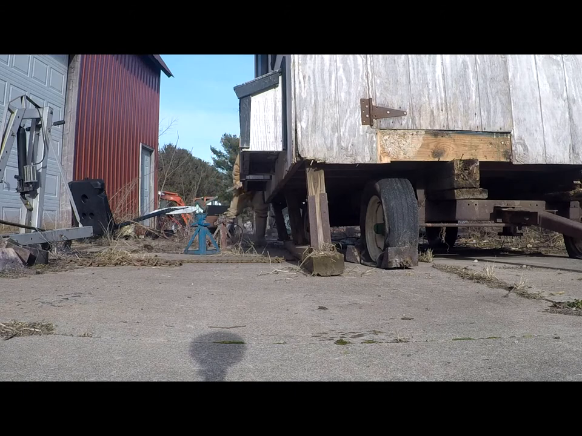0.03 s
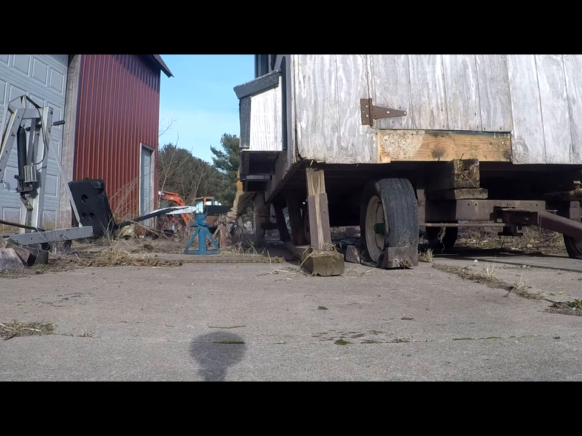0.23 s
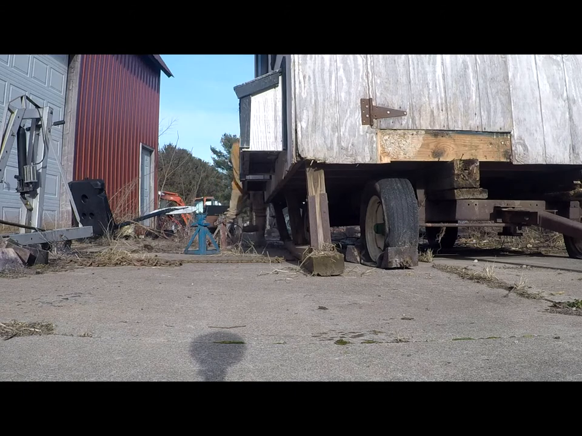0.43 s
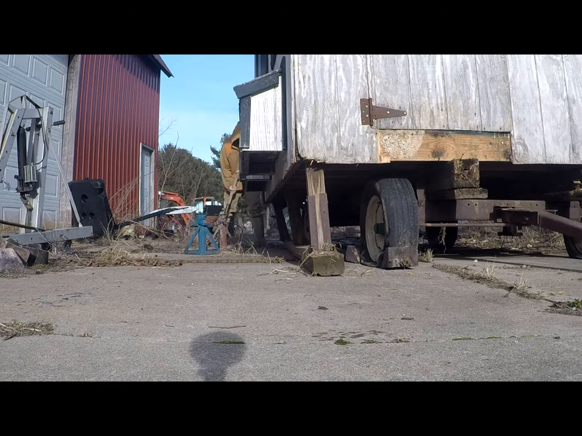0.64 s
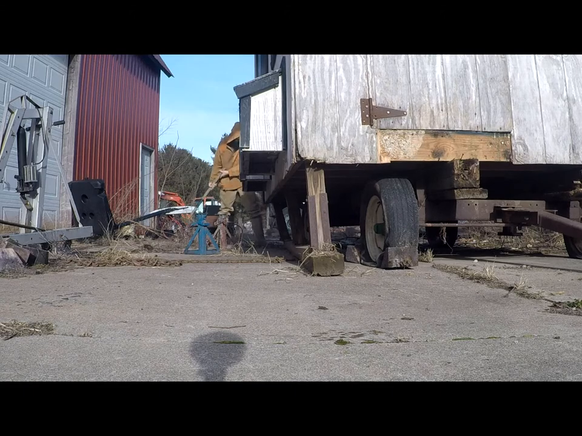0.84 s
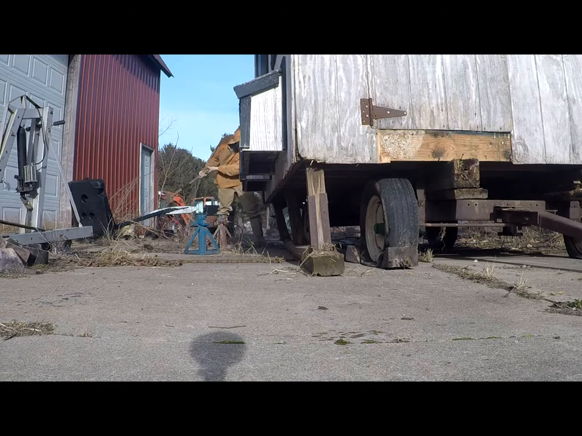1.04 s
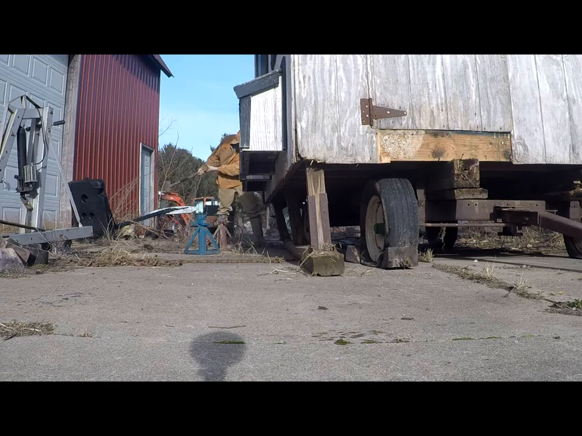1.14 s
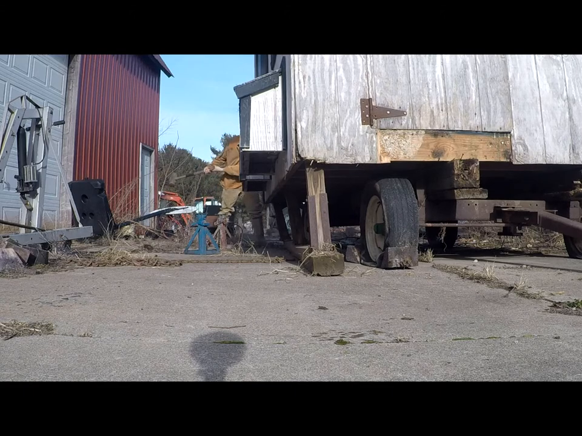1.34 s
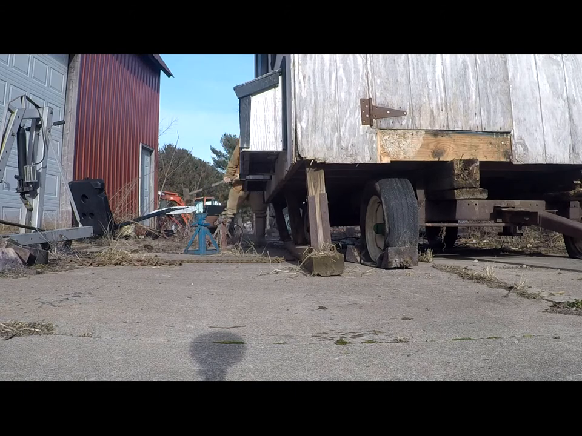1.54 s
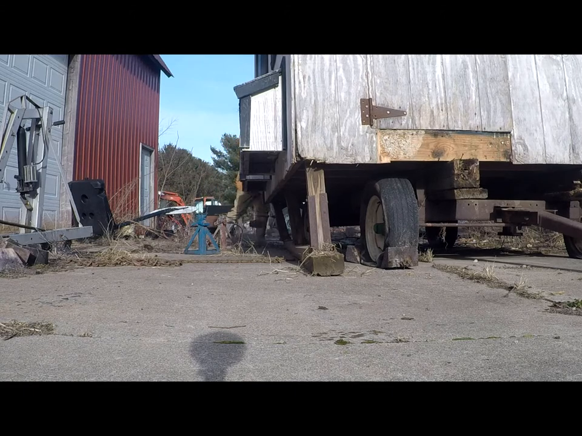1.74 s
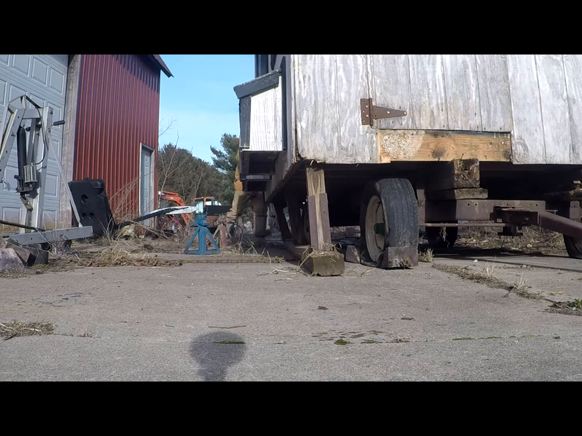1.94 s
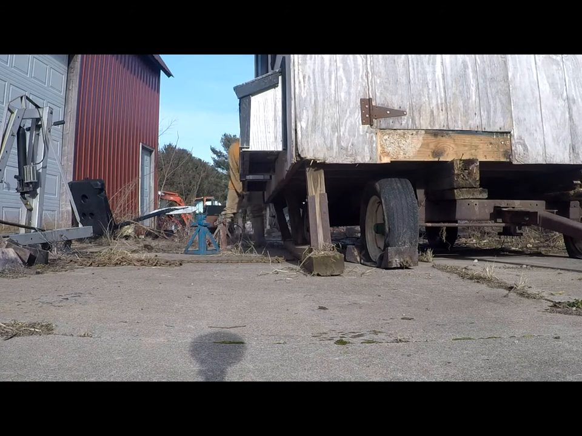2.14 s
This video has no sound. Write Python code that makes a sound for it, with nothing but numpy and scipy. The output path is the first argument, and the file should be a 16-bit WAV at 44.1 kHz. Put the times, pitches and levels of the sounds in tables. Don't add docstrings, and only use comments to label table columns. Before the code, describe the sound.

Jack handle slams twice outdoors, loud overloaded metallic clanks with woody boom and barn-wall echo

```python
import sys
import numpy as np
from scipy import signal
from scipy.io import wavfile
from scipy.ndimage import uniform_filter1d

SR = 44100
rng = np.random.default_rng(int(sys.argv[2]) if len(sys.argv) > 2 else 0)


def how_loud(loudness_db):
    steps = np.asarray(loudness_db, float) / 20
    return 10 ** steps


def unload_wav(signal):
    wavfile.write(
        sys.argv[1],
        SR,
        np.round(np.clip(np.atleast_2d(signal).T, -1, 1) * 32767).astype(np.int16),
    )


N = 97020

# contact in seconds, level in dB, timber boom in dB, brightness in dB per octave,
# time until the limiter catches it in seconds.
BLOWS = [
    (0.2511, 0.8, 1.9, 0.57, 0.03),
    (1.8436, -0.2, -6, -0.46, 0.037),
]


def at_hz(points, hz):
    return np.interp(np.log(hz), np.log(np.array(points)[:, 0]), np.array(points)[:, 1])


def rms_one(x):
    return x / np.sqrt(np.mean(x ** 2) + 1e-20)


def band(low_hz, high_hz, x):
    edges_hz = [low_hz, min(high_hz, .45 * SR)]
    return signal.sosfilt(signal.butter(2, edges_hz, "band", fs=SR, output="sos"), x)


def decay(start_s, t60, attack_s=.001):
    t = np.maximum(np.arange(N) / SR - start_s, 0)
    return np.minimum(t / attack_s, 1) * how_loud(-60 * t / t60)


def strike(modes, hits, spread_db):
    out = np.zeros(N)
    luck = rng.standard_normal((len(hits), len(modes)))
    for k, (hz, db, t60) in enumerate(modes):
        clicks = np.full(N, 1e-18)
        for (s, hit_db), z in zip(hits, luck[:, k]):
            clicks[int(s * SR)] += how_loud(db + hit_db + spread_db * z)
        r = how_loud(-60 / (t60 * SR))
        w = 2 * np.pi * hz / SR
        ring = signal.lfilter([0, np.sin(w)], [1, -2 * r * np.cos(w), r * r], clicks)
        out += (-1) ** k * ring
    return out


def hollow_knocks(rows, rise_s=0.0065):
    t = np.arange(N) / SR
    return sum(how_loud(db) * decay(s, t60, rise_s) * np.sin(2 * np.pi * hz * (t - s)) for s, db, hz, t60 in rows)


def bands():
    edges = 28 * 2 ** np.arange(0, 9.6, .5)
    white = rng.standard_normal((2, N + SR))
    return [(np.sqrt(lo * hi), band(lo, hi, white[k % 2])[SR:])
            for k, (lo, hi) in enumerate(zip(edges, edges[1:]))]


def colour_rms(colour, noise):
    return np.sqrt(np.mean(sum(how_loud(at_hz(colour, hz)) * x for hz, x in noise) ** 2))


def ducking_db():
    t = np.arange(N) / SR
    ahead_s, fall_s, hold_s, recover_s, depth_db = .019, .011, 0.21, 0.53, -23
    dips = []
    for s, *_ in BLOWS:
        fall = np.clip((t - s + ahead_s) / fall_s, 0, 1)
        recovery = np.exp(-(np.maximum(t - s - hold_s, 0) / recover_s) ** 1.32)
        dips.append(fall * depth_db * recovery)
    return uniform_filter1d(np.min(dips, axis=0), size=64)


def air():
    # frequency in Hz, density in dB per Hz.
    air_colour = [(30, -1), (80, 1.5), (200, -6), (600, -13.5), (1400, -16), (5000, -25.5), (15000, -31)]
    # time in seconds, level in dB.
    gusts = [(0, -45.5), (.22, -47), (0.4, -47.5), (.56, -49.5), (.7, -44.5), (0.808, -44), (.845, -59),
             (.88, -45.5), (.99, -42.5), (1.06, -48.5), (1.3, -49), (1.5, -50.5), (1.58, -47.5),
             (1.76, -46), (1.95, -53), (2.2, -42)]
    duck, noise = ducking_db(), bands()
    s, db = np.transpose(gusts)
    gust = np.interp(np.arange(N) / SR, s, db - db.mean())
    gust_reach = [(200, 0.94), (500, 0.0068)]  # Hz, share of the gust
    duck_share = [(150, 0.22), (1200, 1.0), (5000, 1.02), (13000, 1.25)]  # Hz, share of the ducking
    out = np.zeros(N)
    for hz, x in noise:
        level_db = -42.5 + at_hz(air_colour, hz)
        out += how_loud(level_db + at_hz(duck_share, hz) * duck + at_hz(gust_reach, hz) * gust) * x
    return out / colour_rms(air_colour, noise)


def wind():
    # time in seconds, level in dB.
    pressure = [(0.0, -38), (0.541, -38), (0.76, -33), (1.03, -29), (1.21, -33), (1.371, -25),
                (1.82, -34.5), (2.08, -43), (2.2, -39.5)]
    s, db = np.transpose(pressure)
    swing_hz = 4.0
    slow = band(swing_hz / 2, swing_hz * 2, rng.standard_normal(N + SR))[SR:]
    buffet = band(6.8, 45, rng.standard_normal(N))
    return how_loud(np.interp(np.arange(N) / SR, s, db)) * (rms_one(slow) + how_loud(-21.5) * rms_one(buffet))


def boots():
    # start in seconds, level in dB, centre in Hz, t60 in seconds.
    ticks = [(.076, -37.5, 1810, 0.096), (0.135, -41.5, 2790, 0.053), (0.404, -45.5, 6200, 0.11),
             (0.523, -46, 1170, 0.033), (0.599, -50.5, 1230, 0.18), (.676, -77, 1880, 0.06),
             (.745, -71.5, 10900, .03), (0.783, -46.5, 1090, 0.082), (.802, -61, 7500, 0.044),
             (0.827, -56, 6200, 0.065), (1.054, -50, 2280, 0.192), (1.06, -47, 5900, 0.075),
             (1.075, -43, 3600, 0.024), (1.183, -52, 2900, 0.13), (1.356, -48.5, 2580, 0.32),
             (1.401, -43, 1790, 0.095), (1.425, -52, 2230, 0.09), (1.612, -49, 1200, .06),
             (1.634, -50, 2980, 0.36), (1.677, -44, 1900, 0.19)]
    # start in seconds, level in dB,
    # centre in Hz, t60 in seconds.
    wake_ticks = [
        (.339, -35, 4000, 0.2),
        (.34, -40, 10000, 0.072),
        (0.406, -41.5, 2700, 0.12),
        (.461, -42, 3330, 0.028),
        (.716, -53.5, 2980, 0.053),
        (.803, -66, 12900, .03),
        (0.827, -52.5, 2000, .04),
    ]
    # start in seconds, length in seconds, level in dB, top in Hz, hollow ring in Hz.
    shuffles = [
        (0.502, 0.1, -48, 680, 455),
        (0.641, 0.11, -49, 790, 600),
        (0.736, 0.065, -46, 320, 152),
        (0.849, 0.15, -44.5, 496, 402),
        (0.932, 0.077, -54, 250, 145),
        (1.007, 0.079, -40, 523, 414),
        (1.044, 0.17, -47.5, 303, 186),
        (1.122, 0.13, -58.5, 515, 390),
        (1.186, 0.047, -60, 250, 142),
        (2.085, 0.1, -55, 707, 499.6),
    ]
    t, white = np.arange(N) / SR, rng.standard_normal(N)
    out = np.zeros(N)
    for s, db, hz, t60 in ticks + wake_ticks:
        out += how_loud(db) * decay(s, t60, 0.0016) * rms_one(band(hz / 1.65, hz * 1.254, white))
    edge_s = 0.023
    for s, length, db, hz, ring_hz in shuffles:
        shape = np.clip(np.minimum(t - s, (s + length - t) / 2) / edge_s, 0, 1)
        scrape = band(117, hz, white) + 0.07 * band(hz, 1.1 * hz, white)
        hollow = band(0.88 * ring_hz, 1.03 * ring_hz, white)
        out += how_loud(db) * shape * rms_one(scrape)
        out += how_loud(db - 13) * shape * rms_one(hollow)
    return out


def ground_thud():
    t = np.arange(N) / SR
    grit = band(930, 4500, rng.standard_normal(N))
    lead_s, thud_db, thud_hz, grit_db = 0.009, -4.5, 230, -19
    out = np.zeros(N)
    for s, _, boom_db, *_ in BLOWS:
        swell = np.clip((t - s) / lead_s + 1, 0, 1) * (t < s + .002)
        out += swell ** 2 * how_loud(thud_db + boom_db) * np.cos(2 * np.pi * thud_hz * (t - s + 0.001))
        out += swell * how_loud(grit_db) * grit
    return out


def body_and_echo():
    # frequency in Hz, density in dB per Hz.
    blow_colour = [(40, -7.5), (110, -18.5), (200, -14), (320, -13), (750, -22), (1300, -22.5),
                   (6160, -38.5), (15500, -57.5)]
    # frequency in Hz, t60 in seconds.
    blow_t60 = [(40, 0.13), (150, 0.35), (300, 0.18), (1000, 0.16), (4000, 0.16), (14000, 0.16)]
    t, noise, out = np.arange(N) / SR, bands(), np.zeros(N)
    body_db, hold_s, rise_cycles = -7.5, 0.0041, 0.47
    echo_db, echo_stretch = -14.5, 2.65
    for s, db, _, tilt_db, _ in BLOWS:
        late = np.maximum(t - s - hold_s, 0)
        for hz, x in noise:
            t60 = at_hz(blow_t60, hz)
            rise = np.clip((t - s) * hz / rise_cycles, 0, 1)
            fall = how_loud(-60 * late / t60) + how_loud(echo_db - 60 * late / (echo_stretch * t60))
            level_db = body_db + db + at_hz(blow_colour, hz) + tilt_db * np.log2(hz / 1000)
            out += how_loud(level_db) * rise * fall * x
    return out / colour_rms(blow_colour, noise)


def crack():
    burst = band(1500, 8770, rng.standard_normal(N))
    return sum(how_loud(db - 4) * decay(s, 0.049, 0.002) * burst for s, db, *_ in BLOWS)


def steel_head():
    # frequency in Hz, level in dB, t60 in seconds.
    head_modes = [
        [(480, -2, 0.044), (1148, 1.5, 0.046), (1526, -0.5, 0.041), (1962, -1, .06), (2277, -2.5, .06),
         (2563, -5, .05)],
        [(1010, 1, .05), (1190, 0, 0.04), (1535, 0, .035), (1734, -10, .07), (1977, -9, .07), (2348, -5, 0.054)],
    ]
    return sum(strike(modes, [(s + .001, db - 8)], spread_db=4.5)
               for (s, db, *_), modes in zip(BLOWS, head_modes))


def timber():
    # frequency in Hz, level in dB, t60 in seconds.
    timber_modes = [
        [(64, -15, 0.19), (117, -20.5, .13), (225.3, -10, 0.24), (295.7, 3.5, 0.046), (254, -9.5, 0.1),
         (377, -9.5, 0.057), (472, -14.5, 0.075), (681, -11.5, 0.14), (799, -13.5, 0.083), (978, -20, .09),
         (1112, -20, 0.16), (1225, -15, 0.15), (1720, -23, 0.08), (2215, -19.5, 0.1)],
        [(107.5, -11.5, 0.22), (200, -13.5, 0.3), (282, 5.5, 0.055), (235, -9.5, 0.26), (356.6, -9.5, 0.2),
         (457, -1.5, 0.09), (517, -5, .09), (610, -3.5, 0.12), (805, -23.5, .1), (990, -10.5, 0.11),
         (1090, -7, 0.13), (1340, -16, 0.072), (1713, -20.5, 0.08), (2000, -21.5, 0.08)],
    ]
    # time after the blow in seconds, level in dB.
    jolt_sets = [
        [(.003, -6.5), (.0098, -1.5), (.0166, 1.5), (.03, -13), (.052, -13)],
        [(.003, -3.5), (.0101, 1), (.0172, -1), (.038, -7.5), (.06, -13.5)],
    ]
    out = np.zeros(N)
    for (s, _, boom_db, *_), modes, jolts in zip(BLOWS, timber_modes, jolt_sets):
        hits = [(s + lag, -5.5 + boom_db + jolt_db) for lag, jolt_db in jolts]
        out += strike(modes, hits, spread_db=2.0)
    return out


def blows():
    t = np.arange(N) / SR
    catch_s, overshoot_db = 0.017, 4.5
    loose = sum(np.clip((s + hold - t) / catch_s, 0, 1) * (t > s) for s, *_, hold in BLOWS)
    whole = ground_thud() + body_and_echo() + crack() + steel_head() + timber()
    return whole * how_loud(overshoot_db * loose)


def clinks():
    # frequency in Hz, level in dB, t60 in seconds.
    handle = [(7520, -71, 1.5)]
    pawl = [(1935, -7, .22), (3180, -2, .04), (4608, 5, .04), (4640, -3, .12), (6460, -10, .07),
            (8742, 2, .035), (8660, -11, .11), (12080, -23, .26), (12180, -5, .06), (12600, -9, .04),
            (13870, -14, .07)]
    latch = [(2270, -2, 0.11), (2520, -1, 0.05)]
    pin = [(2299, -9, .09), (2740, -16, .5), (2810, -3, .04), (3079, -11, .08), (3440, -6, .05),
           (4161, -12, .1), (5405, -8, .07)]
    link = [(2130, -7, 0.05), (3076, -5, 0.15), (4590, -2, 0.09)]
    washer = [(6300, -10, .04), (13940, 0, .08), (14300, -8, .05)]
    bolt = [(1960, -2, .12), (2350, -3, .08), (5300, -3, .03), (8620, -6, .04)]
    # time in seconds, peak in dB.
    pawl_hits = [
        (0.3396, -28.5),
        (0.4075, -49),
    ]
    latch_hits = [
        (.408, -44),
    ]
    pin_hits = [
        (.462, -40),
    ]
    link_hits = [
        (.7149, -59),
    ]
    washer_hits = [
        (.9195, -51),
        (1.125, -57),
    ]
    bolt_hits = [
        (1.0516, -47.5),
        (1.354, -50),
    ]
    parts = [(handle, [(s, db) for s, db, *_ in BLOWS]), (pawl, pawl_hits), (latch, latch_hits),
             (pin, pin_hits), (link, link_hits), (washer, washer_hits), (bolt, bolt_hits)]
    rings = sum(strike(modes, hits, 0) for modes, hits in parts)
    scatter = (rng.standard_normal(N) * decay(0, .07))[:SR // 8]
    scattered = signal.fftconvolve(rings, scatter / np.linalg.norm(scatter))[:N]
    flutter = how_loud(3.0 * rms_one(band(7.7, 90, rng.standard_normal(N))))
    return flutter * (rings + how_loud(-3) * scattered)


def boards():
    # start in seconds, peak in dB, frequency in Hz, t60 in seconds.
    board_rows = [
        (.277, -7, 233, 0.12),
        (.318, -22, 370, .12),
        (.303, -25, 1160, 0.13),
        (.3, -26, 680, 0.11),
        (.352, -25, 265, .14),
        (1.845, -8, 520, 0.078),
        (1.858, -12.5, 1050, 0.12),
        (1.866, -14, 615, 0.09),
        (1.878, -12, 235, 0.2),
        (1.897, -17.5, 196, 0.28),
    ]
    return hollow_knocks(board_rows)


def knocks():
    # start in seconds, peak in dB, frequency in Hz, t60 in seconds.
    knock_rows = [(.878, -44, 200, 0.095), (.9, -42, 444, .1), (.915, -36, 288, 0.098),
                  (.925, -41, 163, 0.087), (.95, -42, 159.5, 0.075), (1.025, -34, 150, .07),
                  (1.039, -31, 441, .12), (1.04, -31.5, 299, 0.092), (1.058, -33.5, 197, 0.2),
                  (1.13, -46, 545, 0.14), (1.155, -40, 434, 0.14), (1.19, -54, 1205, .1),
                  (1.192, -33, 156, 0.12), (.345, -35, 183, 0.089), (.67, -40, 633, 0.11),
                  (.52, -44, 191, 0.073)]
    return hollow_knocks(knock_rows)


def scene():
    return (air() + wind() + boots() + blows() + clinks() + boards() + knocks())[None]


def low_pass(x):
    return signal.sosfilt(signal.butter(12, 16190, fs=SR, output="sos"), x)


def record(dry):
    ceiling, hardness = .95, 3.0
    flat = dry / (1 + np.abs(dry / ceiling) ** hardness) ** (1 / hardness)
    top_cut = signal.cheby2(28, 42, 15480, fs=SR, output="sos")
    return low_pass(signal.sosfilt(top_cut, flat))


dry = scene()
out = record(dry)
unload_wav(out)
```